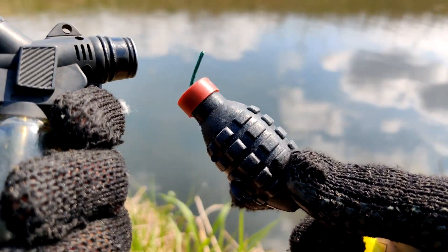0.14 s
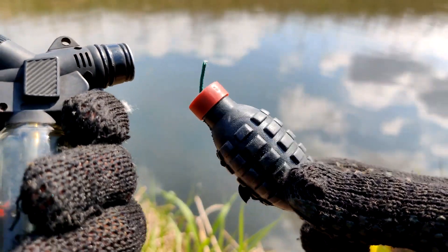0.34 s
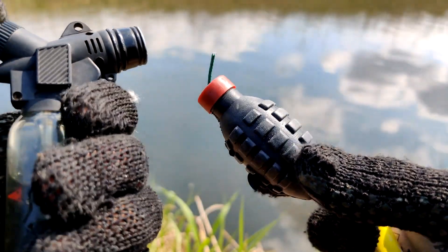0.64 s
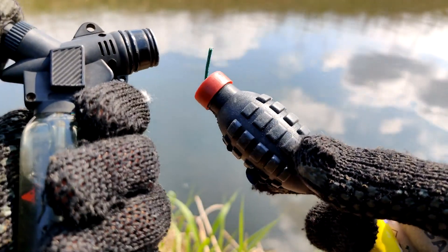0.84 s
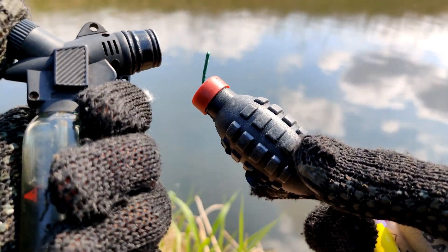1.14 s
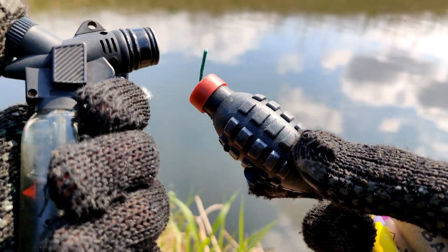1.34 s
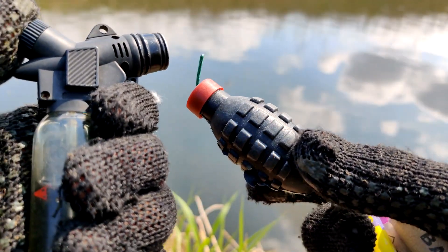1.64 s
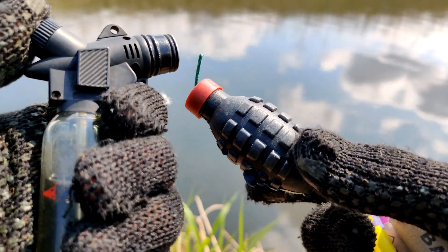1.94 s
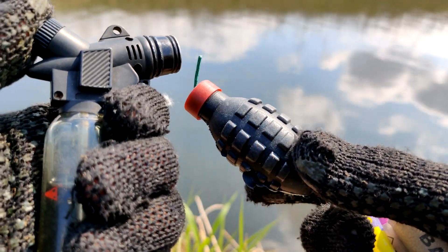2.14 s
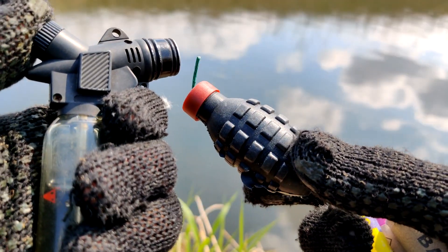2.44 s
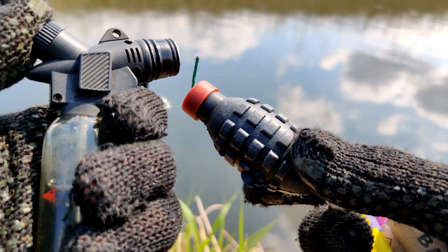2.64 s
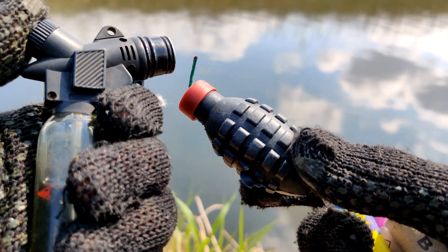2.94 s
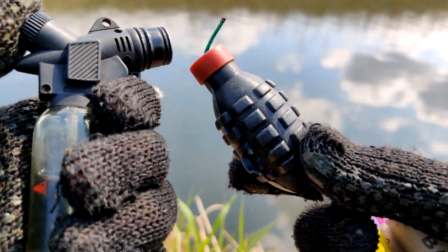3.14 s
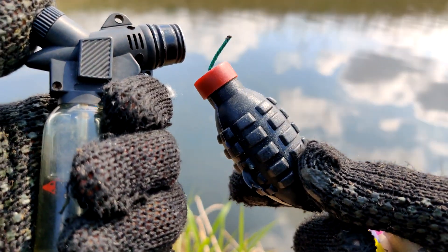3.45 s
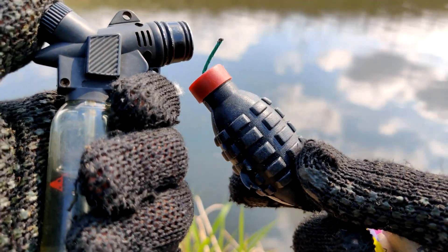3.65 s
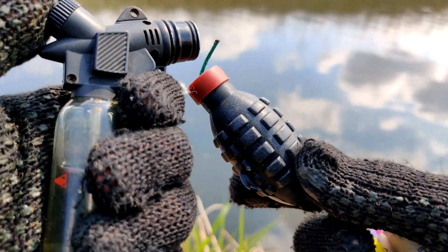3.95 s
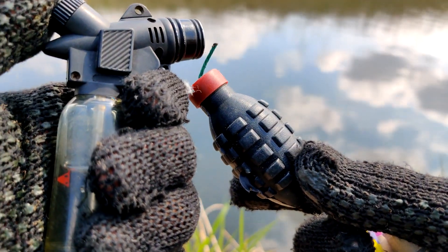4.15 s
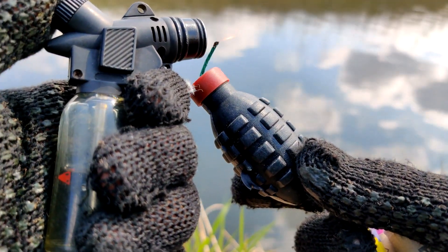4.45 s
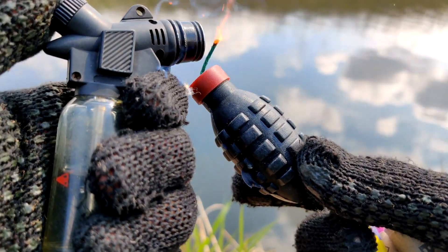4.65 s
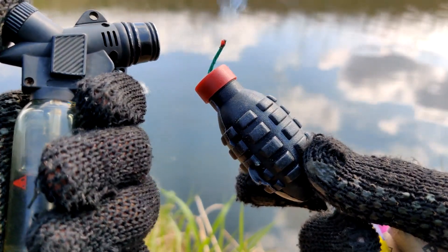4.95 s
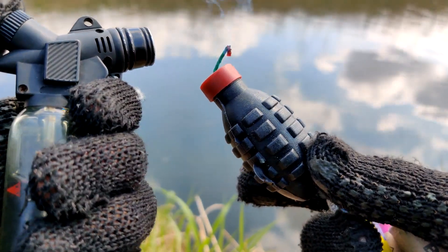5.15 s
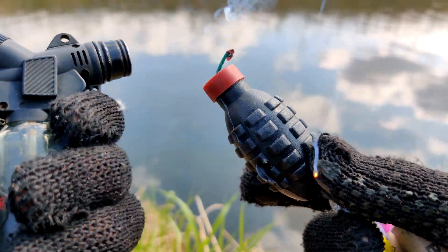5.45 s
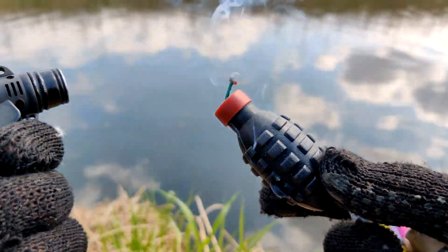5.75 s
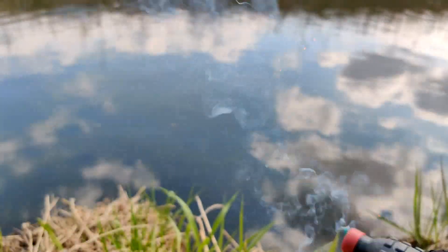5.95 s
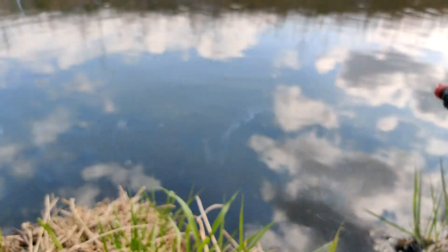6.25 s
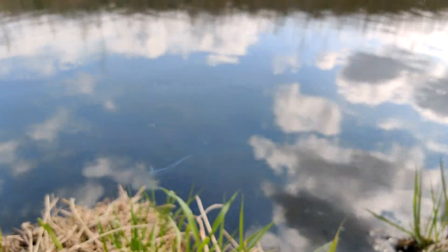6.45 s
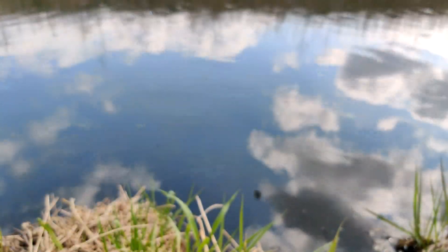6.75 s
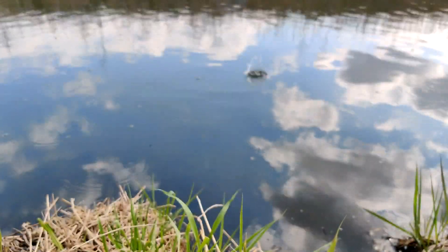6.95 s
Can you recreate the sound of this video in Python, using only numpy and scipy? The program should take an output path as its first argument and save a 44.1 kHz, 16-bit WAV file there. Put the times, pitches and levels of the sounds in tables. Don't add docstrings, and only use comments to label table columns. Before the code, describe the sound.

Outdoors beside still water, heard close in stereo, with light low wind buffeting, a faint airy floor and a distant engine humming very low. At 0.1 s a lighter trigger ticks and gas hisses thinly until about 0.5; more small plastic and metal ticks follow, with renewed hiss from 0.85. At 1.06 a sharp, very loud spark snap ignites the jet. The flame roars softly with a hissy top, fluttering, popping and briefly gulping in the breeze, weaker from 3.5 to 4.6. Around 4.65 a fuse flares and begins a bright fizz with scattered crackling spits. The flame cuts off near 5.35; the fizz continues, shifting right around 6.0 as the arm draws back. Cloth rustles and air swishes at 6.3, then stronger at 6.7 to 6.9, with a brief rough falling whistle near 6.8. At 7.0 the object slaps the water with a short plop and tiny bubbles.

```python
import sys
import numpy as np
from scipy import signal
from scipy.fft import rfft, irfft, next_fast_len
from scipy.io import wavfile
from scipy.ndimage import uniform_filter1d, map_coordinates

SR = 44100
rng = np.random.default_rng(int(sys.argv[2]) if len(sys.argv) > 2 else 0)


def decibels_to_gain(level_db):
    exponent = np.asarray(level_db, float) / 20
    return 10 ** exponent


def store_pcm(level_fs):
    pcm = np.round(np.clip(level_fs, -1, 1) * 32767).astype(np.int16)
    wavfile.write(sys.argv[1], SR, np.atleast_2d(pcm).T)


N = 313135
SWING_FROM_S = 6.0


# time in [s], lag in [samples].
FLAME_LAG = [(1.1, 8.84), (3.45, 8.55), (3.55, 7.72), (4.25, 7.3), (4.5, 6.9), (4.75, 7.87), (5.2, 9.05)]
# frequency in [Hz], lead at the right port in [samples].
FLAME_BEND = [(2600, 0), (5700, .55), (8300, 0.62), (10300, -.1), (12500, -0.46)]
# time in [s], peak in [dB], left minus right in [dB].
SPARK = (1.0606, 2.2, -2.5)


def in_time(rows, outside=None):
    s, *columns = np.transpose(rows)
    return [np.interp(np.arange(N) / SR, s, c, left=outside, right=outside) for c in columns]


def drift(rate_hz):
    r = np.exp(-80 * np.pi * rate_hz / SR)
    slow = signal.lfilter([1], [1, -2 * r, r * r], rng.standard_normal(N // 40 + 2002))[2000:]
    return np.interp(np.arange(N) / 40, np.arange(len(slow)), slow / slow.std())


def grains(per_s, spread_db):
    size_db = spread_db * np.minimum(rng.exponential(1, N), 5)
    pops = (rng.random(N) < per_s / SR) * decibels_to_gain(size_db)
    return (pops - pops.mean()) / pops.std()


def swells(rows, floor_db=-99):
    t = np.arange(0, N + 16, 16) / SR
    power = decibels_to_gain(2 * floor_db)
    for start, end, level_db, rise, fall in rows:
        outside = np.maximum(np.maximum((start - t) / rise, (t - end) / fall), 0)
        power = power + decibels_to_gain(2 * level_db - 20 * outside)
    return np.interp(np.arange(N) / SR, t, 10 * np.log10(power))


def heard(source, colour, low_hz, high_hz, alike, alike_hz, lag=0, bend=((1, 0),)):
    hiss_top_hz = 15930
    size = next_fast_len(N)
    hz = np.arange(size // 2 + 1) * SR / size + 1e-3
    at, level_db, right_db = np.transpose(colour)
    octaves_beyond = np.maximum(np.log2(at[0] / hz), 0) + np.maximum(np.log2(hz / at[-1]), 0)
    left = decibels_to_gain(np.interp(np.log(hz), np.log(at), level_db) - 12 * octaves_beyond) * (hz < hiss_top_hz)
    right = left * decibels_to_gain(np.interp(np.log(hz), np.log(at), right_db))
    share = np.clip(alike, 0, 1) / (1 + (hz / alike_hz) ** 2)
    late = map_coordinates(source, [np.arange(N) - lag + np.zeros(N)], order=3, mode="mirror")
    other = rng.permutation(source)
    sooner = np.exp(2j * np.pi * hz / SR * np.interp(hz, *np.transpose(bend)))
    mixed = np.sqrt(share) * sooner * rfft(late, size) + np.sqrt(1 - share) * rfft(other, size)
    band = (hz > low_hz) & (hz < high_hz)
    power = np.sum(left[band] ** 2 + right[band] ** 2) / size
    return irfft([left * rfft(source, size), right * mixed], size)[:, :N] / np.sqrt(power)


def panned(x, pan_db):
    return x * decibels_to_gain(np.array([pan_db / 2, -pan_db / 2]))


def split_low(x, cut_hz):
    low = signal.sosfiltfilt(signal.butter(2, cut_hz, fs=SR, output="sos"), x)
    return low, x - low


def ring(clicks, hz, t60):
    r, w = decibels_to_gain(-60 / (t60 * SR)), 2 * np.pi * hz / SR
    return signal.lfilter([0, np.sin(w)], [1, -2 * r * np.cos(w), r * r], clicks)


def add(out, s, sound, pan_db, lag):
    left_start = round(s * SR)
    for port, start, gain_db in [(0, left_start, pan_db / 2), (1, left_start + lag, -pan_db / 2)]:
        out[port, start:start + sound.shape[1]] += decibels_to_gain(gain_db) * sound[port, :N - start]


def rattle(modes, burst_s, scatter_db, crack_db):
    t = np.arange(2600) / SR
    shower = rng.standard_normal((2, len(t)))
    shower[0, 0] = 3.73
    shower = (shower[0] + 0.45 * shower[1] * [[1], [-1]]) * np.exp(-t / burst_s)
    sound = decibels_to_gain(crack_db) * signal.lfilter([1, -1], [1, -.7], shower)
    for hz, level_db, t60 in modes:
        strength_db = level_db + rng.normal(0, scatter_db, (2, 1))
        sound = sound + decibels_to_gain(strength_db) * ring(shower, hz, t60)
    return sound / np.abs(sound).max()


def arm(rustle=0):
    # time in [s], level in [dB], 10 dB rise in [s], 10 dB fall in [s], rustle against swish in [dB].
    swings = [
        (5.79, -58.5, 0.35, .06, 7.5),
        (5.952, -47, 0.2, 0.05, -5.5),
        (6.1, -54, 0.15, 0.3, 2.5),
        (6.3, -45.5, 0.04, 0.13, 1),
        (6.68, -44.5, .11, 0, 2.5),
        (6.74, -49.5, 0.12, 0.12, 13),
        (6.8, -43, 0.05, 0.1, -9),
        (6.92, -43.5, 0.08, 0, -3.5),
    ]
    return swells([(s, s, level_db + rustle * rustle_db, rise, fall)
                   for s, level_db, rise, fall, rustle_db in swings])


def engine_tone(hz, level_db, wander_hz, wander_db):
    phase = 2 * np.pi * np.cumsum(hz + wander_hz * drift(3.53)) / SR
    apart_rad = np.array([[1], [-1]]) * (.35 + .2 * drift(2.5))
    return decibels_to_gain(level_db + wander_db * drift(11.0)) * np.sin(phase + apart_rad)


def engine():
    # time in [s], frequency in [Hz], level in [dB].
    hum = [(0, 48.24, -41.5), (1.1, 48.18, -42.5), (1.8, 48.4, -36.5), (2.3, 49.25, -34), (3.4, 49.9, -36),
           (4.6, 50.5, -41.5), (5.1, 51.48, -37.5), (6.0, 52, -39.5), (7.1, 51.6, -47.5)]
    low_hz, low_db = in_time(hum)
    tones = engine_tone(low_hz, low_db + 2.5, wander_hz=1.9, wander_db=2.0)
    tones = tones + engine_tone(78.2, -48, wander_hz=1.786, wander_db=3.0)
    return tones * decibels_to_gain(np.array([[-.6], [.6]]))


def air():
    air_colour = [(154, 1, 0), (302, -12, 1.5), (700, -15.5, 0.5), (1500, -21.5, 2.5), (3020, -18.5, -3),
                  (6000, -26, 1), (10000, -31, 0.5), (15600, -25, -3)]
    return decibels_to_gain(-54.5) * heard(rng.standard_normal(N), air_colour, 129, 18000, alike=0.47, alike_hz=600)


def wind():
    # time in [s], level in [dB], 10 dB rise or fall in [s], left minus right in [dB].
    gusts = [(.17, -37.5, -0.34, 18), (.29, -25, 0.03, -7), (.71, -41.5, 0.2, -18), (.97, -33.5, 0.5, 0),
             (1.7, -39, 0.02, -18), (1.82, -41, .2, 9), (1.92, -33, .25, -5.5), (2.45, -42, 0.6, 0.5),
             (2.75, -40, 0.17, -4), (3.2, -44, .6, -7), (4.7, -48.5, 0.6, -1), (5.18, -37.5, 0.1, -14),
             (5.3, -37.5, 0.17, 11.5), (5.7, -47, 0.6, 3), (6.38, -45, 0.17, -7), (6.58, -48, 0, -5)]
    wind_colour = [(8, 2, 0), (22.1, 0, 0), (45.6, -3.5, 0), (91.6, -14.5, 0.0012), (173, -30, 0),
                   (390, -45.5, 0)]
    calm_db = -51.5
    left_db, right_db = [swells([(s, s, level_db + side * pan_db, width, width)
                                 for s, level_db, width, pan_db in gusts], calm_db)
                         for side in (.22, -.64)]
    level_db = np.array([left_db + 1.7 * drift(1.1), right_db + 1.3 * drift(3.6)])
    return decibels_to_gain(1.4 + level_db) * heard(rng.standard_normal(N), wind_colour, 11.0, 52, alike=0.51, alike_hz=300)


def lighter_ticks():
    # time in [s], peak in [dB], left minus right in [dB], low modes in [dB], high modes in [dB].
    ticks = [(0.1188, -18, 4, -11, -0.5), (0.1465, -28, 6, 2, 5), (0.438, -24.5, 7, -1, -2),
             (0.6698, -33, 4.5, 17.5, 12), (0.7496, -36, 6, -0.5, -4), (0.7629, -33.5, 6, 0, -6),
             (0.789, -29.5, 5, -2, -2), (0.8448, -24.5, 7.5, 5, 1), (0.9035, -21, 5.5, 10.5, 8),
             (1.0558, -33, 0.5, 3, -8), (1.1044, -27, -11, 7, 4)]
    body_modes = [(2220, -9, 0.011), (2640, -3.5, 0.003), (3780, -1.5, 0.0016), (5300, 2.5, 0.0041),
                  (6200, 2, 0.0025), (7750, -9, 0.0048), (10100, 0, 0.0012), (11810, -12, .003),
                  (14200, -13, .003)]
    spark_modes = [(2500, -4, 0.0062), (3450, -6, .004), (4300, 3, 0.006), (5500, -2, 0.0033),
                   (6700, 0.5, .0025), (9000, -1, .002), (9650, -2, 0.0023), (10600, -4, .002),
                   (12100, -1, .0025), (13600, -2, .002), (14700, 4, .0025), (15700, -1, .002)]
    # frequency in [Hz], level in [dB], t60 in [s].
    thump = (254, -18, 0.018)
    out = np.zeros((2, N))
    for s, peak_db, pan_db, low_db, high_db in ticks:
        modes = [(hz, level_db + low_db * (hz < 4500) + high_db * (hz > 8500), t60)
                 for hz, level_db, t60 in body_modes]
        tick = rattle(modes, burst_s=0.00097, scatter_db=4.0, crack_db=13.5 + high_db)
        add(out, s, decibels_to_gain(peak_db + 5.5) * tick, pan_db, lag=14)
    s, peak_db, pan_db = SPARK
    snap = rattle(spark_modes, burst_s=0.001, scatter_db=1.1, crack_db=12.0)
    add(out, s, decibels_to_gain(peak_db) * snap, pan_db, lag=14)
    hz, level_db, t60 = thump
    click = np.eye(1, 6000) * [[1], [1]]
    add(out, s, decibels_to_gain(level_db) * ring(click, hz, min(t60, .06)), 0, lag=8)
    return out


def gas():
    # open in [s], shut in [s], level in [dB], 10 dB fall in [s].
    leaks = [
        (0.127, 0.485, -56.5, .025),
        (.8, .845, -65, -1.5),
        (0.85, 1.052, -55.5, 0.7),
        (1.11, 1.12, -69, -0.5),
    ]
    # time in [s], level in [dB], left minus right in [dB].
    nozzle = [(1.08, -69.5, 3), (1.13, -53, 3), (1.45, -49.5, 3), (2.8, -48.5, 1), (3.47, -45, -1),
              (3.95, -50, -1.5), (4.4, -50, -3), (4.68, -48, -1), (4.74, -50, 3), (5.35, -47, 2),
              (5.5, -56, 2)]
    leak_colour = [(2260, 1.5, -4.5), (3980, -7, 2), (5430, 1.5, 3.5), (6250, -4, 0), (7500, 8, -5),
                   (8790, -2, 0), (9800, 0, 5.5), (11000, -7, 2.6), (13300, -5, 5), (15600, -9, 6)]
    nozzle_colour = [(11000, -5.5, 1.4), (11800, -4.5, 8.5), (13000, -1, 11.5), (14750, 3, 7),
                     (15740, 2.5, 9.7)]
    valve_rise_s = .004
    leak_db = swells([(start, end, level_db, valve_rise_s, fall) for start, end, level_db, fall in leaks])
    leak = heard(rng.standard_normal(N), leak_colour, 5300, 11400, alike=0.15, alike_hz=12000, lag=13.2)
    jet = heard(rng.standard_normal(N), nozzle_colour, 14420, 16000, alike=0.6, alike_hz=15000,
                lag=in_time(FLAME_LAG)[0] + 0.11, bend=FLAME_BEND)
    jet = panned(jet, in_time(nozzle)[1])
    jet_db = in_time(nozzle, outside=-99)[0] - 2.0 + 1.1 * drift(15)
    return decibels_to_gain(leak_db + 4) * leak + decibels_to_gain(jet_db) * jet


def flame():
    # time in [s], low roar in [dB].
    vigour = [(1.16, -38), (1.3, -38.5), (1.6, -34), (1.75, -37), (2.2, -33.5), (2.55, -36.5), (3, -35.5),
              (3.15, -33.5), (3.38, -32.5), (3.47, -39.5), (4, -41), (4.35, -38.5), (4.41, -44.5),
              (4.58, -44), (4.66, -40), (4.8, -34), (5.2, -37), (5.3, -33.5)]
    # start in [s], length in [s], crackle loss in [dB], < 0 sharpens.
    gulps = [(1.285, 0.017, 7), (1.318, 0.03, 4), (1.491, 0.025, 7.5), (1.523, .16, -3.5),
             (1.528, 0.035, 13), (1.561, 0.08, 12), (1.682, 0.029, 8), (1.882, 0.02, 6.5),
             (1.927, 0.075, 13), (2.048, 0.0215, 11), (2.114, 0.3, 1.9), (2.157, 0.057, 10),
             (2.284, 0.018, 15), (2.338, 0.025, 6), (2.498, 0.22, -1.5), (3.055, 0.029, 7.5),
             (3.08, .22, 2), (3.168, 0.13, 5), (4.252, 0.13, 3.5), (4.757, 0.44, 6), (5.218, 0.061, 4.5),
             (5.313, 0.091, -1.5)]
    # time in [s], peak in [dB].
    pockets = [(1.279, -32), (1.372, -26.5), (1.516, -29), (1.56, -28), (1.814, -26.5), (1.945, -27),
               (2.003, -24), (2.219, -24), (2.377, -25), (2.404, -25), (2.629, -26), (2.661, -26.5),
               (2.765, -24.5), (3.047, -26.5), (3.085, -25), (3.172, -22.5), (3.291, -29), (3.943, -31),
               (4.693, -26.5), (4.752, -30), (4.829, -27.5)]
    pop_gaps_s = [.0007, .0026, .0043]
    flame_colour = [(246, -10.5, -2.5), (486, -3, -2.5), (680, 0.5, -0.85), (1200, 0.35, 0.7),
                    (1710, -3.5, -0.5), (2500, 1, -7), (2860, -2, 2.5), (4230, -8.5, -5), (5030, -8.5, 1.5),
                    (6280, -14.5, 2), (8300, -15.5, -7), (8850, -27, 8.5), (10500, -20.5, -1.5)]
    catch_db_s, die_db_s, shut_s, gulp_fade_s = 128, 130, 5.345, 0.004
    t = np.arange(N) / SR
    catch_db = catch_db_s * np.maximum(vigour[0][0] - t, 0) + 99 * (t < SPARK[0])
    roar_db = in_time(vigour)[0] - catch_db - die_db_s * np.maximum(t - shut_s, 0)
    crackle_db = roar_db + 0.17 - 0.5 * catch_db
    gulp_db = np.zeros(N)
    for s, length, depth_db in gulps:
        gulp_db += depth_db * (1 - np.exp(-np.maximum(t - s, 0) / gulp_fade_s)) * (t < s + length)
    gulp_db = uniform_filter1d(gulp_db, size=60)
    burning = 0.64 * rng.standard_normal(N) - .66 * grains(6000, spread_db=3.0)
    for s, peak_db in pockets:
        over_roar_db = peak_db - roar_db[round(s * SR)]
        burning[[round((s + gap) * SR) for gap in pop_gaps_s]] -= decibels_to_gain(over_roar_db + 10.2)
    both = heard(burning, flame_colour, 298, 1540, alike=.94, alike_hz=12000,
                 lag=in_time(FLAME_LAG)[0], bend=FLAME_BEND)
    low, high = split_low(both, 1700)
    flicker = drift(23.5)
    roar = low * decibels_to_gain(roar_db - 0.13 * gulp_db + 1.0 * drift(14.4) + 1.35 * flicker)
    return roar + high * decibels_to_gain(crackle_db - gulp_db + 1.02 * flicker + 1.1 * drift(105))


def fuse():
    # time in [s], level in [dB], right port lag in [samples], left minus right in [dB].
    fizz_path = [(4.58, -63, 6.5, 0), (4.7, -54.5, 7, 0), (5.1, -54, 5.5, 0.5), (5.32, -50.5, 5.1, 2),
                 (5.65, -53, 5, -0.5), (5.9, -54.5, 4.5, 0), (6.04, -57, -7, -3.5),
                 (6.3, -57.5, -2.5, -5.5), (6.5, -60.5, -11, -1.5), (6.9, -60.5, -8, -2),
                 (7.1, -66, -5.5, 0)]
    # time in [s], peak in [dB], left minus right in [dB], low modes in [dB].
    spits = [(4.6984, -26, -1.0, -4), (4.8724, -27.5, 0.0, -4.5), (4.9282, -23, 1.0, -6),
             (4.9791, -27, 0.0, -6), (5.0614, -26, -0.5, -4), (5.2094, -26, 0.5, -5),
             (5.2614, -24, -0.5, -4), (5.277, -20, 2.5, -4), (5.3494, -20, 1.5, -4), (5.6114, -31, 1, -6),
             (5.6276, -29, -1.5, -4), (5.6905, -29, -1.0, -4), (5.7678, -27, -2, -4),
             (5.819, -26, -0.5, -6), (5.9084, -34, -2.0, -4), (5.9224, -28, -1.5, -4),
             (6.0884, -31, -3.0, -4), (6.1734, -34, -5.5, -7), (6.3127, -33, -4.5, -4),
             (6.4088, -31, 0.0, -2), (6.4174, -41, -2.5, -4), (6.5091, -36, 2.0, -4), (6.6797, -24, -2, -2),
             (6.7364, -27, -3.5, -4)]
    # frequency in [Hz], lead at the right port in [samples].
    fuse_bend = [(1000, 0), (4300, -.4), (6500, -.9), (8600, -1.5), (14000, -1.4)]
    fuse_colour = [(476, 4, -2), (1300, -0.5, 0.5), (2300, -3.5, -3.5), (3300, 4, -5), (5330, 2.9, 1.1),
                   (6900, -0.5, 1.5), (9000, -1, 6.5), (10700, -4.5, 4), (13500, 2, 2.5), (15600, -0.5, 0)]
    fizz = 0.95 * rng.standard_normal(N) * decibels_to_gain(3.0 * drift(60))
    fizz = fizz + 0.37 * grains(500, spread_db=4.0) * rng.choice([-1, 1], N)
    swing_db = 0.36 * np.clip(arm() + 50, -25, 0) * (np.arange(N) / SR > SWING_FROM_S)
    lag = in_time(fizz_path)[1] - 0.47 * swing_db
    out = heard(fizz, fuse_colour, 8200, 11440, alike=0.72, alike_hz=14000, lag=lag, bend=fuse_bend)
    out = panned(out, in_time(fizz_path)[2]) * decibels_to_gain(in_time(fizz_path, outside=-99)[0] + swing_db + 3)
    for s, peak_db, pan_db, low_db in spits:
        modes = [(hz, low_db * (hz < 4500), .0025) for hz in np.geomspace(2500, 14500, 7)]
        spit = rattle(modes, burst_s=0.00056, scatter_db=5.5, crack_db=3.0)
        add(out, s, decibels_to_gain(peak_db + 4) * spit, pan_db, lag=5 if s < SWING_FROM_S else -7)
    return out


def flare():
    burst = (4.64, 4.86, -45, .15, .25)
    flare_colour = [(70, -4.5, 0), (130, -2.5, 0), (250, -7, -1), (440, -5, -1)]
    out = heard(rng.standard_normal(N), flare_colour, 110, 350, alike=0.97, alike_hz=900, lag=4.8)
    arm_flutter_db = -55 + 0.75 * (arm() + 45)
    level_db = np.maximum(swells([burst]), arm_flutter_db)
    return out * decibels_to_gain(level_db - 1.5 + 2.0 * drift(38))


def sleeve():
    sleeve_colour = [(248, -5, 1.25), (510, 1, 4.5), (1030, 0.5, 0.98), (2000, -1.5, 3.2),
                     (3540, 0.5, 2.82), (6005, -8, 3.0), (10000, -16, 6.7), (15580, -15, 4.7)]
    swish_db, rustle_db = arm(), arm(rustle=0.95)
    rub = 0.79 * rng.standard_normal(N) + .5 * grains(900, spread_db=3.0) * rng.choice([-1, 1], N)
    both = heard(rub, sleeve_colour, 350, 1320, alike=0.17, alike_hz=5000, lag=-7.5)
    low, high = split_low(both, 1300)
    return low * decibels_to_gain(swish_db - 0.7 + 2.1 * drift(12)) + high * decibels_to_gain(rustle_db - 3.0 + 2.0 * drift(32))


def arm_push():
    # time in [s], level in [dB], half width in [s].
    pushes = [(6.362, -22.5, 0.01404)]
    t = np.arange(N) / SR
    bump = np.zeros(N)
    for s, level_db, width in pushes:
        u = (t - s) / width
        bump += decibels_to_gain(level_db) * (1 - u ** 2) * np.exp(-.5 * u ** 2)
    return bump * np.array([[.25], [1]])


def whistle():
    flight = (6.755, 6.84, -50, .015, .015)
    start_hz, sag_hz_s = 3300, 11000
    hz = start_hz - sag_hz_s * (np.arange(N) / SR - flight[0]) + 70 * drift(59)
    return decibels_to_gain(swells([flight]) + 4.3 * drift(40)) * np.sin(2 * np.pi * np.cumsum(hz) / SR)


def splash():
    slap_modes = [(1690, -5, .004), (2210, -4, .004), (2770, 3.5, .006), (3650, -1, 0.0046),
                  (4400, -7, .0023), (5340, -1.5, .005), (7600, -1, .004), (10800, 0.5, .003),
                  (13300, 5, 0.0033)]
    # time in [s], level in [dB], start frequency in [Hz], t60 in [s].
    drops = [
        (7.0054, -7.5, 890, 0.013),
        (7.0058, -10, 1380, 0.0069),
        (7.038, -26, 4800, 0.005),
        (7.05, -44, 1200, 0.065),
        (7.069, -33, 801, 0.015),
        (7.093, -41, 2500, .012),
        (7.098, -31, 2500, 0.009),
    ]
    slap_s, pan_db = 7.0027, -1.8
    out, t = np.zeros((2, N)), np.arange(3000) / SR
    thin = signal.butter(4, 850, "high", fs=SR, output="sos")
    for level_db, burst_s in [(-8, 0.0017), (-17, .005)]:
        slap = signal.sosfilt(thin, rattle(slap_modes, burst_s, scatter_db=1.5, crack_db=15.0))
        add(out, slap_s, decibels_to_gain(level_db) * slap, pan_db, lag=-1)
    for s, level_db, hz, t60 in drops:
        envelope = (1 - np.exp(-t * hz / 1.5)) * decibels_to_gain(-60 * t / t60)
        bubble = decibels_to_gain(level_db) * envelope * np.sin(2 * np.pi * hz * t * (1 + .12 * t / t60))
        add(out, s, bubble * [[1], [1]], pan_db, lag=-1)
    return out


def scene():
    outdoors = engine() + air() + wind()
    lighter = lighter_ticks() + gas() + flame()
    throw = sleeve() + arm_push() + whistle() + splash()
    return outdoors + lighter + fuse() + flare() + throw


def limiter(x, knee_db, release_db_s):
    over_db = np.maximum(20 * np.log10(np.abs(x).max(axis=0) + 1e-9) - knee_db, 0)
    ramp_db = release_db_s * np.arange(N) / SR
    held_db = np.maximum.accumulate(over_db + ramp_db) - ramp_db
    return x * decibels_to_gain(-signal.lfilter([.006], [1, -.994], held_db))


def roll_off(x):
    return signal.sosfilt(signal.butter(12, 17080, fs=SR, output="sos"), x)


def record(dry):
    held = limiter(dry, knee_db=-9.5, release_db_s=101)
    top_cut = signal.cheby2(14, 80, 17000, fs=SR, output="sos")
    mix = signal.sosfilt(top_cut, np.clip(held, -1, 1))
    return roll_off(mix)


dry = scene()
out = record(dry)
store_pcm(out)
```